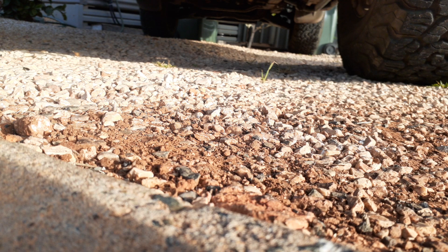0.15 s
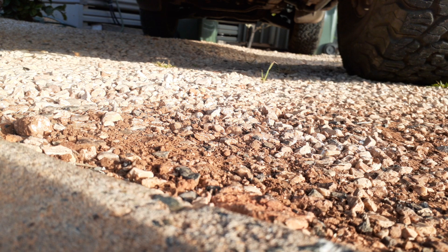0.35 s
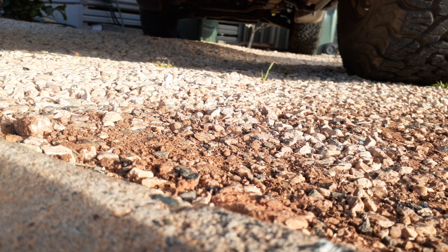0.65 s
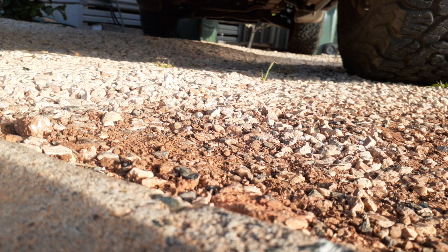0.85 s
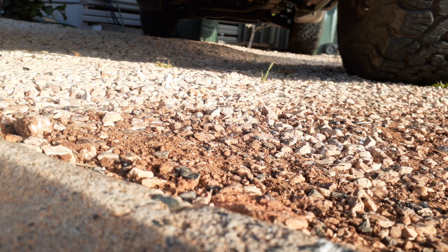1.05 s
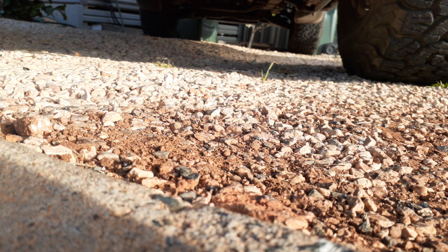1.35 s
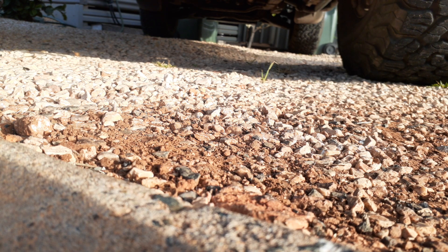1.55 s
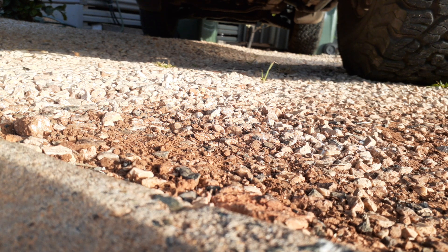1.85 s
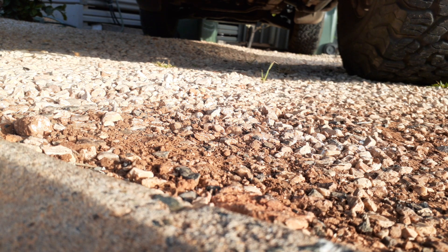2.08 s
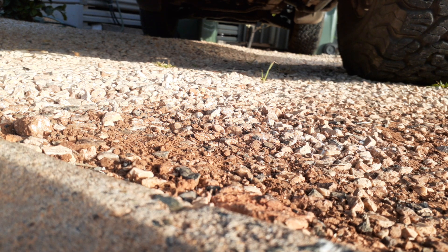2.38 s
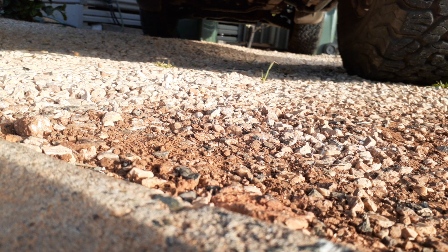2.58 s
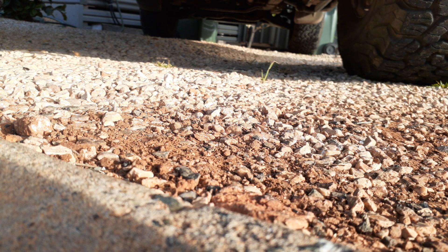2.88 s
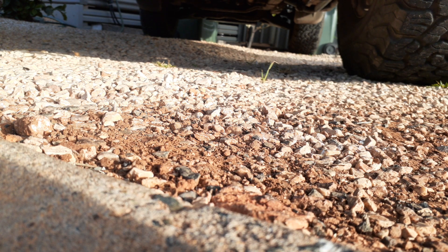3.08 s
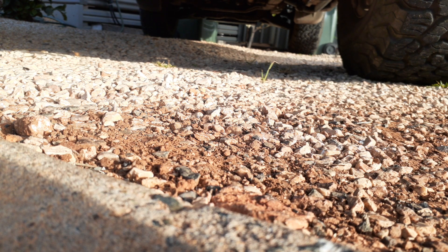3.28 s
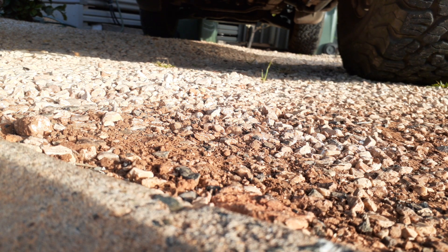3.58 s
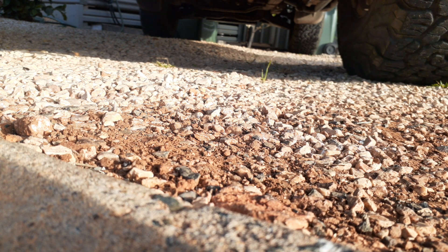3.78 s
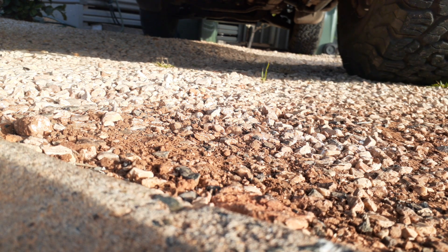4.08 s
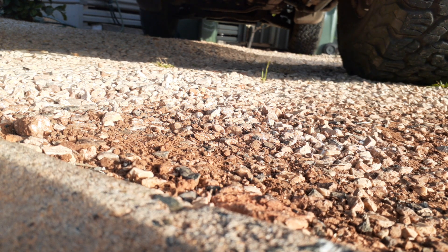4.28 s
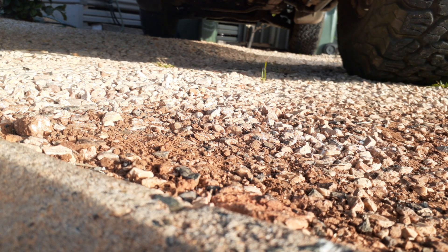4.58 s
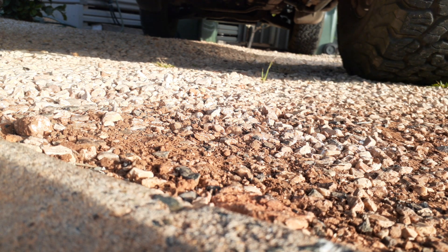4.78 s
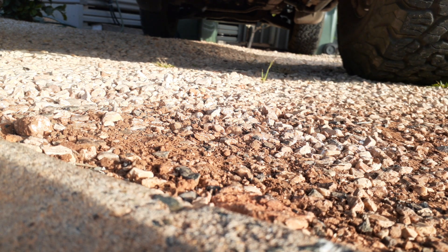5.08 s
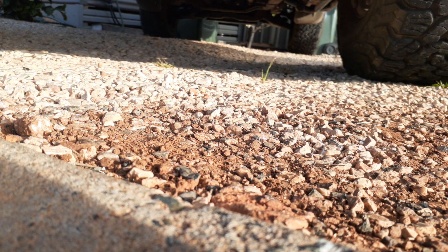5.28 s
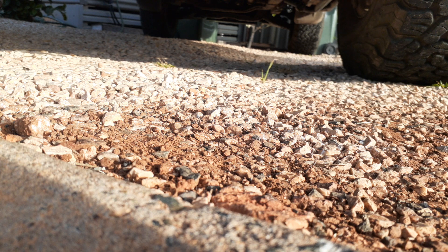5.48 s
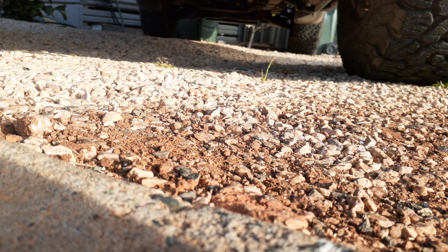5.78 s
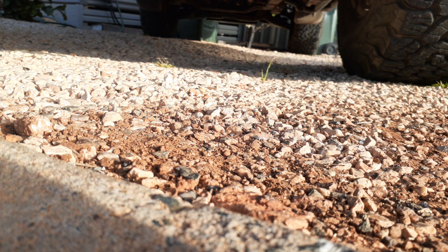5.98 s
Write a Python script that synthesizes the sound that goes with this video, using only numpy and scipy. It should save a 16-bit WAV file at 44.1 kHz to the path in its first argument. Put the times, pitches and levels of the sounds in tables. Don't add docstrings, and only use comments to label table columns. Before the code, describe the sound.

Close beside a parked off-road vehicle, a turbo-diesel chugs steadily, is revved once with a rising whistle, sinks back and refires with air spits.

```python
import sys
import numpy as np
from scipy import signal
from scipy.fft import rfft, irfft
from scipy.io import wavfile
from scipy.ndimage import uniform_filter1d

SR = 44100
rng = np.random.default_rng(int(sys.argv[2]) if len(sys.argv) > 2 else 0)


def nominal_scale(level):
    x = np.asarray(level, float) / 20
    return 10 ** x


def dump_mix(stems):
    frames = np.atleast_2d(stems).T
    limited = np.clip(frames, -1, 1)
    pcm = np.round(limited * 32767).astype(np.int16)
    wavfile.write(sys.argv[1], SR, pcm)


N = 270774
TIME = np.arange(N) / SR

# (time [s], firing rate [Hz])
SPEED = [(0.0, 28.97), (0.5, 30.91), (1.0, 30.18), (1.43, 29.96), (3.04, 30.03), (3.19, 32.5), (3.3, 39.58),
         (3.38, 43.86), (3.61, 63.01), (3.9, 88.78), (3.94, 90.68), (4.14, 81.53), (4.56, 66.14),
         (5.02, 52.18), (5.56, 37.88), (5.73, 31.23), (5.9, 39.42), (6.14, 41.4)]
# (time [s], opening [0-1])
THROTTLE = [
    (0, 0.01),
    (3.15, 0),
    (3.3, 0.7),
    (3.88, 0.85),
    (3.98, 0),
    (5.72, 0.18),
    (5.82, 0),
    (5.95, 0.1),
    (6.14, 0),
]
# (cut [s], back [s], changeover [s])
FUEL_CUT = (3.945, 5.725, .007)
# (time [s], level [dB])
FLOW = [(0, -21), (0.3, -22.5), (0.8, -23), (1.5, -22.5), (2.5, -22.5), (3.1, -22), (3.3, -16.5),
        (3.42, -20), (3.7, -16.5), (3.92, -17.8), (4.1, -18), (4.55, -23), (4.9, -22.3), (5.1, -26.5),
        (5.725, -25.5), (5.76, -22), (5.9, -21.5), (6.14, -23)]
# (multiple of the firing rate, level firing [dB], level only pumping [dB])
PULSE = [(1, 6.5, 10), (2, 11, 6.5), (3, 9, 4.5), (4, 6, 3), (5, 3, -5.5), (6, 0, -4.5), (7, -5, -9.5),
         (8, -4, -7.2), (9, -8.5, -15)]
CYLINDER_DB = (-0.67, -0.06, -2.6, -0.0065)
KNOCK_DB = (-2, -2, 1.2, 2.5)
# (time [s], strength [dB])
BARKS = [(0.44, -2.5), (0.828, 2.5), (1.094, -4), (1.494, 0), (1.936, -6), (2.062, 0.5), (2.295, 4.5),
         (2.428, -5.5), (2.965, 3), (3.001, 2), (3.129, 9.5), (3.216, 13), (3.272, 13.5), (3.349, 7),
         (3.45, -2.5), (3.597, 14), (3.766, 1), (3.817, 5.5), (4.209, -1.5), (4.421, -5.5), (4.83, -2),
         (5.771, 2)]
# (frequency [Hz], level [dB])
PIPE = [(30, -45.5), (60, -19.5), (75, -8), (89, 1.36), (100, -3), (118, -12.5), (155, -8.5), (186, -30),
        (238, -8.5), (275, -21), (313, -8.5), (345, -20), (380, -15), (450, -51.5)]
# (frequency [Hz], width [Hz], level [dB], extra at full throttle [dB])
PIPE_NOTES = [(153.8, 7, 2.5, -2.5), (234, 15.3, 7, -17), (312.7, 16.7, 6, -5), (383.8, 21, -4, 4.5),
              (460, 15, -5, -2), (530.3, 22, 2, -2), (609.6, 31.7, 1.93, -0.5), (700.6, 20, -0.5, 3),
              (762.5, 20, -2, 5.5), (821.3, 13, -2, 9), (850, 25, -6.5, 8), (994, 97, -11, -2)]
# (frequency [Hz], width [Hz], level [dB], extra at full throttle [dB])
BLOCK_NOTES = [(1152.4, 25, 1, -6), (1316, 68, -3, -1.5), (1463.6, 47, -1.35, 2.2), (1653, 35, -4.5, 6),
               (1866, 373, -15, 2.5), (2350, 81, -10.5, -0.5), (2593, 230, -18, 0.5), (3196, 160, -22.5, 5),
               (3380, 130, -23.5, 4.5), (3746, 81, -27.5, -1.5), (4647, 350, -27.5, -11),
               (4764, 200, -24.5, -5.5)]
# (frequency [Hz], level [dB per Hz], extra at full throttle [dB])
HISS = [(3300, -30, 13), (3840, -1, -1.5), (4750, 0, -5), (6400, -5.5, 3), (7550, -10, 10), (8600, -12, 2),
        (11000, -8, -3), (13500, -8.5, -4), (15800, -9.5, 2)]
# (idle level [dB], rise per octave of speed [dB], rise on full pull [dB],
# rise at full throttle [dB], rise with the fuel cut [dB], pull felt as the engine catches [1 = full])
ROAR_LAW = (-34.5, 8, 9.5, 2, 1, 0.79)
KNOCK_LAW = (-46.5, 6, 10.5, 3.5, 2.8, 1.08)
HISS_LAW = (-68.5, 7.5, 1.5, 2, -2.7, 2.1)
# (time [s], level [dB], length [s], decay [s])
SPITS = [
    (5.585, -42.5, .011, 0.0091),
    (0.375, -73, .03, .012),
    (5.711, -54, .006, .006),
    (5.742, -69, .008, 0.0073),
    (5.773, -73, 0.0055, .008),
    (5.8, -64.5, .006, .008),
    (5.936, -73, .02, .01),
    (6.137, -40, 0.0056, 0.0075),
]
# (frequency [Hz], width [Hz], level [dB], extra at full throttle [dB], always none)
SPIT_BANDS = [(2500, 2000, -0.5, 0), (7000, 1200, -1, 0), (12900, 2100, 2, 0)]
# (time [s], frequency [Hz], level [dB])
BIRD = [
    (.49, 4850, -62),
    (.515, 4500, -51),
    (.535, 4000, -56),
    (.562, 3700, -56),
]
# (time [s], frequency [Hz], level [dB])
TURBO = [
    (3.6, 5000, -64),
    (3.74, 7300, -57),
    (3.9, 10600, -62),
    (4.0, 11000, -67),
    (4.27, 11080, -67),
    (4.6, 10480, -71.5),
    (5.07, 9080, -63),
    (5.3, 8200, -72),
    (5.59, 7300, -71),
]

IDLE_HZ = 30
FULL_PULL_HZ_PER_S = 85
LUGGING = 0.67
CATCH_FADE_S = 0.63
CATCH_RISE_S = 0.06
LEAD_IN = SR * 4 // 30
LEFT_LAG = 2
TOP_HZ, CEILING = 15750, .97


def level(x, db=0):
    return x * nominal_scale(db) / np.sqrt(np.mean(x ** 2))


def ring(x, hz, width_hz):
    return signal.lfilter(*signal.iirpeak(hz, hz / width_hz, SR), x)


def body(x, modes, throttle=0.):
    total = 0
    for k, (hz, width_hz, db, more_db) in enumerate(modes):
        total = total + (-1) ** k * nominal_scale(db + more_db * throttle) * ring(x, hz, width_hz)
    return total


def air(likeness):
    mid, side = rng.standard_normal((2, N))
    shared = np.clip(likeness, 0, 1)
    return np.sqrt((1 + shared) / 2) * mid + np.sqrt((1 - shared) / 2) * side * np.array([[1], [-1]])


def walk(rate):
    k = int(SR / rate)
    return level(uniform_filter1d(uniform_filter1d(rng.standard_normal(N), k), k))


def pan(x, left_db):
    return x * nominal_scale(np.array([[left_db], [-left_db]]) / 2)


def gains(hz, db, size):
    return nominal_scale(np.interp(np.log(np.fft.rfftfreq(size, 1 / SR) + 1), np.log(hz), db))


def causal(gain):
    cepstrum = irfft(np.log(gain))
    half = len(cepstrum) // 2
    cepstrum[1:half] *= 2
    cepstrum[half + 1:] = 0
    return irfft(np.exp(rfft(cepstrum)))[:half]


def puffs(turns, scatter_db, rise, fall, late):
    index, phase = np.divmod(turns - late + 4, 1)
    size_db = np.resize(KNOCK_DB, 600) + scatter_db * rng.standard_normal(600)
    shape = np.exp(-phase / fall) * -np.expm1(-phase / rise)
    close = -np.expm1((phase - 1) / rise)
    return level(nominal_scale(size_db)[index.astype(int)] * shape * close)


def barks(decay_s):
    start, db = np.transpose(BARKS)
    age = TIME - start[:, None] + .005
    return nominal_scale(db) @ (np.clip(age / 0.0014, 0, 1) * np.exp(-np.abs(age) / decay_s))


def loudness(law, speed_hz, throttle, fuel):
    idle_db, octave_db, pull_db, throttle_db, cut_db, catch_pull = law
    since = TIME - FUEL_CUT[1]
    catch = catch_pull * np.clip(since / CATCH_RISE_S, 0, 1) * np.exp(-np.abs(since) / CATCH_FADE_S)
    climb = np.clip(np.gradient(speed_hz) * SR / FULL_PULL_HZ_PER_S, 0, 1)
    pull = np.maximum(climb, catch) * (IDLE_HZ / speed_hz) ** LUGGING
    pull = uniform_filter1d(pull, size=SR // 40)
    speed_db = octave_db * np.log2(speed_hz / IDLE_HZ)
    return idle_db + speed_db + pull_db * pull + throttle_db * throttle + cut_db * (1 - fuel)


def exhaust(turns, fuel):
    flow = 0
    for k, fire_db, pump_db in PULSE:
        strength = (1 - fuel) * nominal_scale(pump_db) - fuel * nominal_scale(fire_db)
        flow = flow + strength * np.sqrt(2) * np.cos(2 * np.pi * k * (turns - .055))
    size_db = np.resize(CYLINDER_DB, 600) + .35 * rng.standard_normal(600)
    cylinder_db = np.interp(turns, np.arange(600), size_db)
    flow = flow * nominal_scale(cylinder_db + np.interp(TIME, *np.transpose(FLOW)))
    flow = np.r_[flow[:LEAD_IN], flow]
    pipe = signal.fftconvolve(flow, causal(gains(*np.transpose(PIPE), size=16384)))
    return pan(pipe[LEAD_IN:LEAD_IN + N], 2.1)


def roar(turns, fuel, throttle, db):
    puff_depth = .3 + .35 * fuel + .5 * throttle
    gate = 1.2 + puff_depth * puffs(turns, 1.5, .05, .4, late=-.04) + 1.3 * barks(.008)
    gas = body(air(0.92) * gate + 12 * barks(0.00022), PIPE_NOTES, throttle)
    gas = gas + (1 - fuel) * (1.0 * ring(gas, 481, 75) - 0.45 * ring(gas, 290, 120))
    return pan(level(gas, 1.0) * nominal_scale(db + 0.083 * walk(11.0)), 1.0)


def knock(turns, fuel, throttle, db):
    rattle = 1.3 - .5 * throttle
    rap_depth = .25 + .35 * fuel + .9 * throttle
    gate = rattle + rap_depth * puffs(turns, 1.6, .04, .3, late=.05) + .4 * barks(.006)
    near = air(.62)
    near[0] = np.roll(near[0], 3)
    block = level(body(near * gate, BLOCK_NOTES, throttle), 0.41)
    return pan(block * nominal_scale(db + 0.48 * walk(1.1)), 3.1)


def hiss(turns, fuel, throttle, db):
    steady = 0.96 * np.gradient(turns) * SR / 30
    gate = steady + (0.25 + 0.41 * fuel) * puffs(turns, 2.1, .03, 0.35, late=0.23)
    hz, shut_db, more_db = np.transpose(HISS)
    noise = rfft(air(0.14) * gate / (1 + steady))
    shut = irfft(noise * gains(hz, shut_db, N), N)
    wide = irfft(noise * gains(hz, shut_db + more_db, N), N)
    return pan(level(shut + throttle * (wide - shut), 8.9) * nominal_scale(db + 0.91 * walk(11)), -1.9)


def breeze():
    return level(ring(ring(air(.99), 54, 60), 42, 63), -47.5) * nominal_scale(5.4 * walk(6.7))


def spits():
    gate = 0
    for start, db, length, decay in SPITS:
        age = TIME - start
        gate = gate + nominal_scale(db) * np.clip(age / .002, 0, 1) * np.exp(-np.maximum(age - length, 0) / decay)
    return pan(level(body(air(.3), SPIT_BANDS)) * gate, -2.5)


def whistle(table, waver, flicker_db, fade_s):
    s, hz, db = np.transpose(table)
    pitch = np.interp(TIME, s, hz) * (1 + waver * walk(440))
    fade = np.clip(np.minimum(TIME - s[0], s[-1] - TIME) / fade_s, 0, 1)
    gain = fade * nominal_scale(np.interp(TIME, s, db) + flicker_db * walk(60))
    return np.sqrt(2) * gain * np.sin(2 * np.pi * np.cumsum(pitch) / SR)


def bird():
    return pan(whistle(BIRD, 0.0016, 1.2, 0.0058), .4)


def turbo(fuel, throttle):
    return pan(whistle(TURBO, .006 + .13 * throttle * fuel, 1.5, .02), -1.5)


def scene():
    speed_hz = np.interp(TIME, *np.transpose(SPEED))
    turns = np.cumsum(speed_hz) / SR
    throttle = np.clip(np.interp(TIME, *np.transpose(THROTTLE)), 0, 1)
    cut, back, change = FUEL_CUT
    fuel = (1 + np.tanh((TIME - cut) / change) * np.tanh((TIME - back) / change)) / 2
    roar_db = loudness(ROAR_LAW, speed_hz, throttle, fuel)
    knock_db = loudness(KNOCK_LAW, speed_hz, throttle, fuel)
    hiss_db = loudness(HISS_LAW, speed_hz, throttle, fuel)
    pipe = exhaust(turns, fuel) + roar(turns, fuel, throttle, roar_db)
    pipe[0] = np.roll(pipe[0], LEFT_LAG)
    block = knock(turns, fuel, throttle, knock_db) + hiss(turns, fuel, throttle, hiss_db)
    return pipe + block + breeze() + spits() + bird() + turbo(fuel, throttle)


def top_cut(x):
    return signal.sosfilt(signal.butter(12, 16400, fs=SR, output="sos"), x)


def record(dry):
    faded_in = dry * np.clip(TIME / .003, 0, 1)
    rounded = faded_in / (1 + (faded_in / CEILING) ** 8) ** (1 / 8)
    low_pass = signal.ellip(8, .2, 70, TOP_HZ, fs=SR, output="sos")
    finished = signal.sosfilt(low_pass, rounded)
    return top_cut(finished)


dry = scene()
out = record(dry)
dump_mix(out)
```